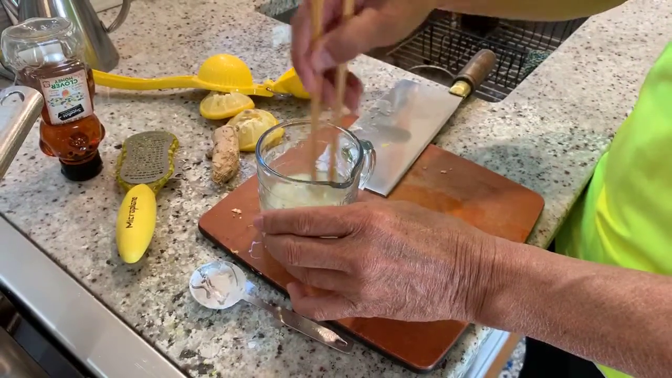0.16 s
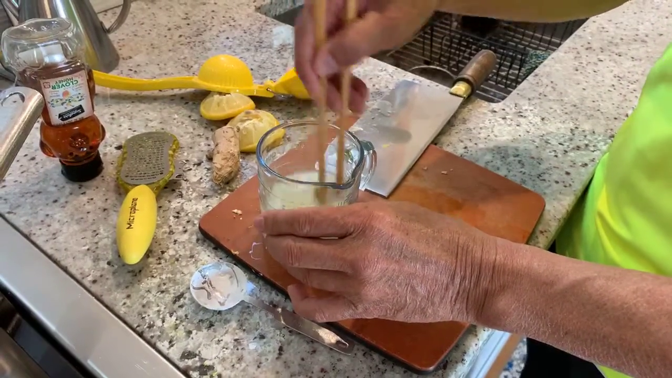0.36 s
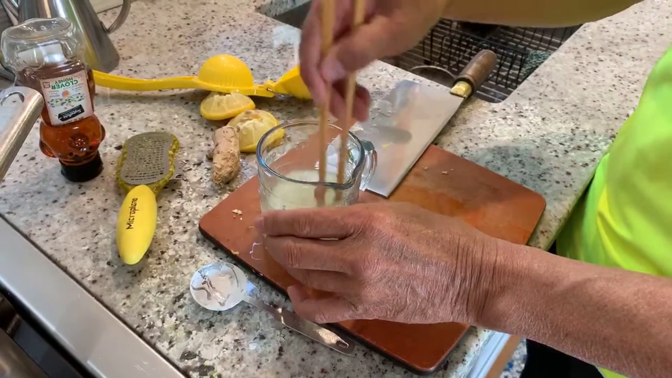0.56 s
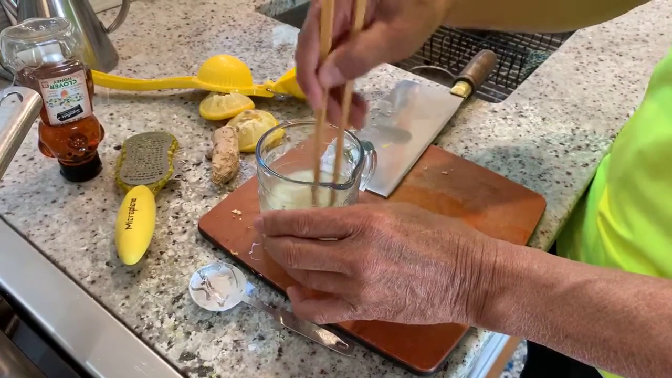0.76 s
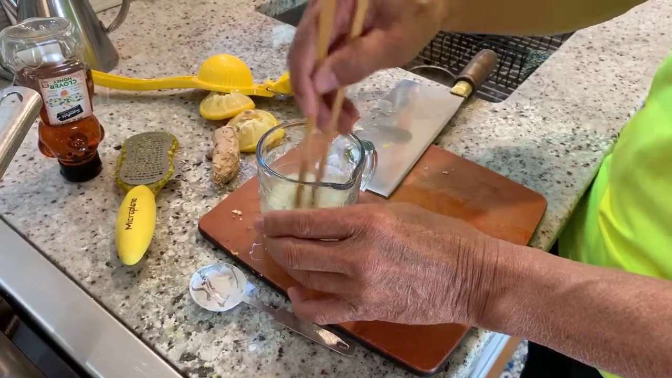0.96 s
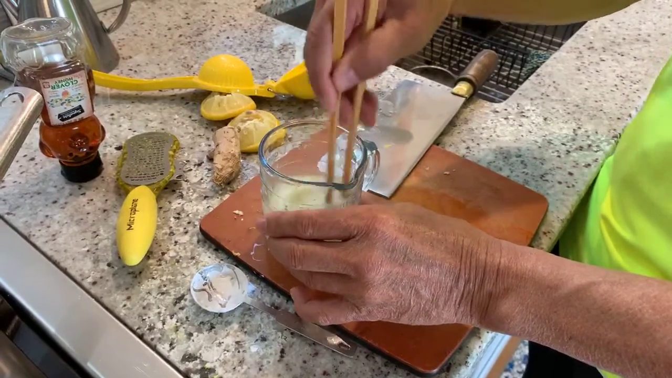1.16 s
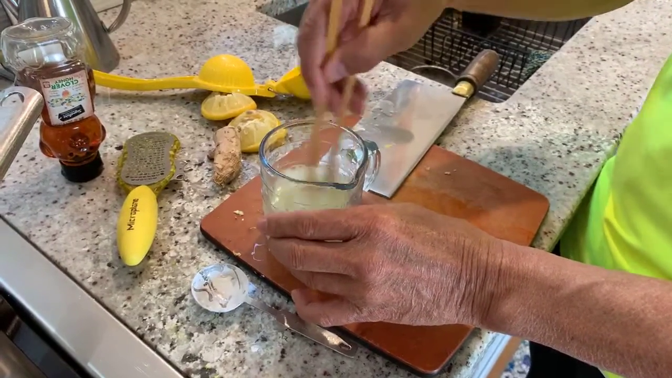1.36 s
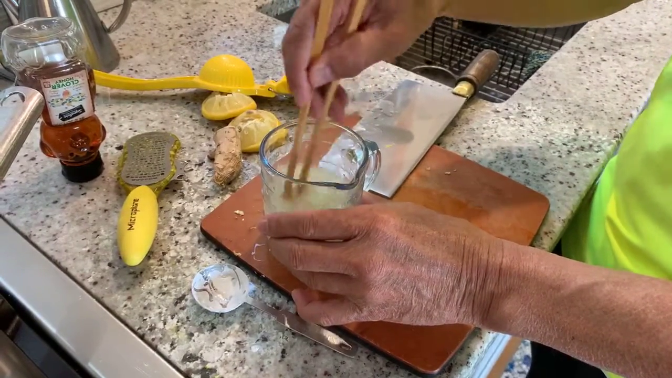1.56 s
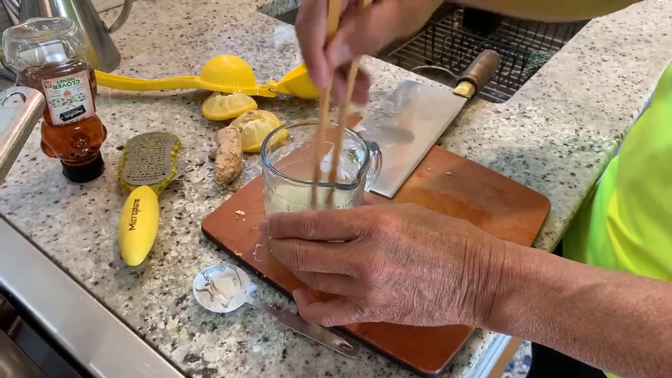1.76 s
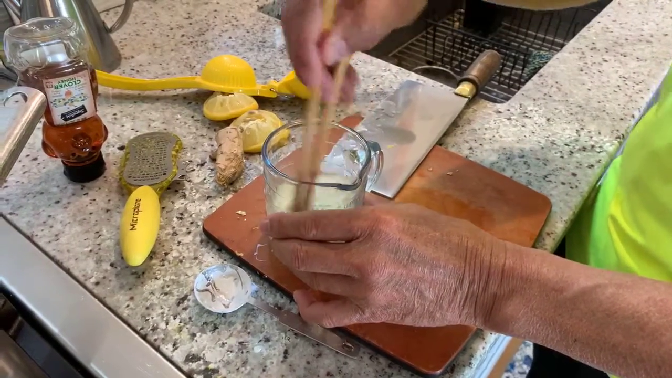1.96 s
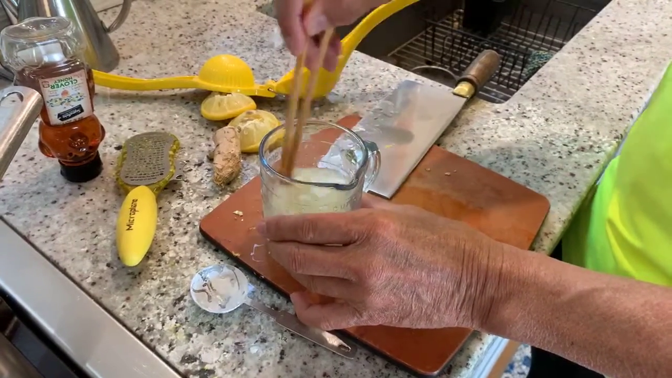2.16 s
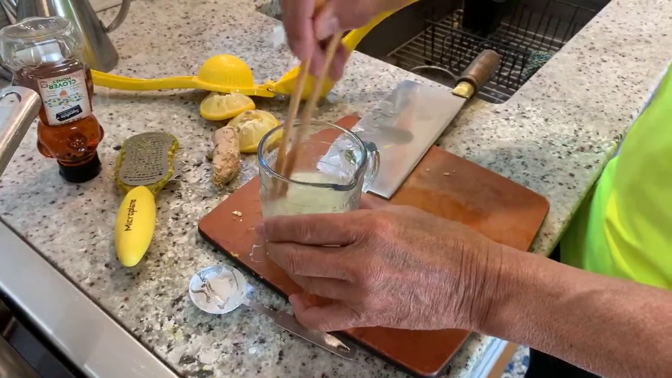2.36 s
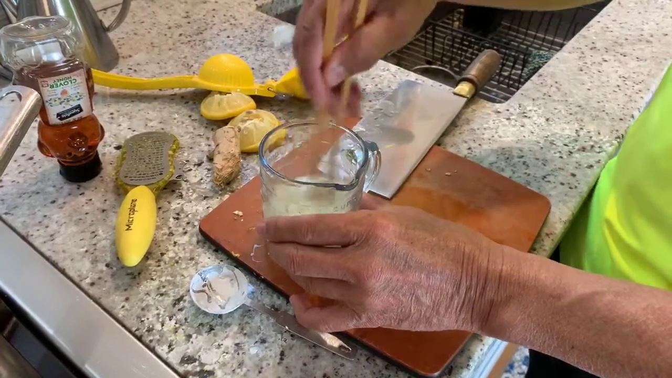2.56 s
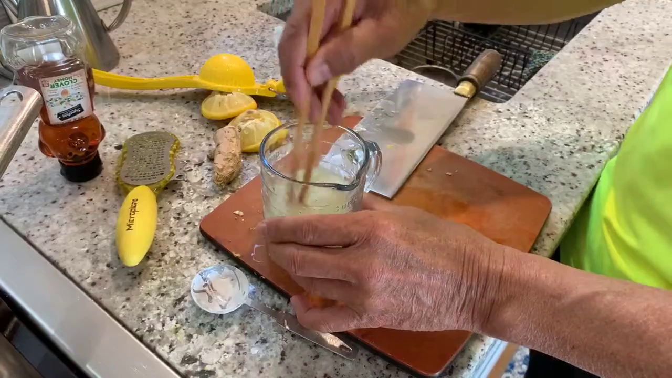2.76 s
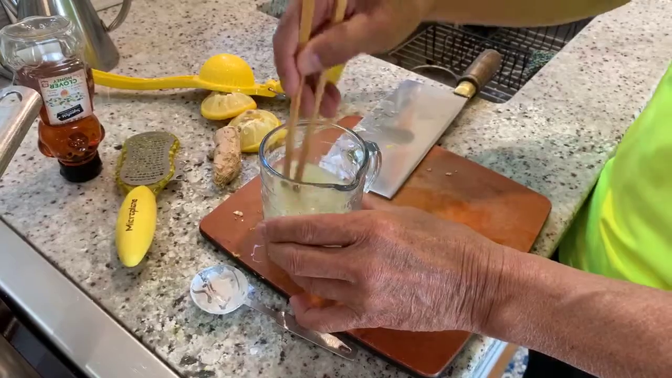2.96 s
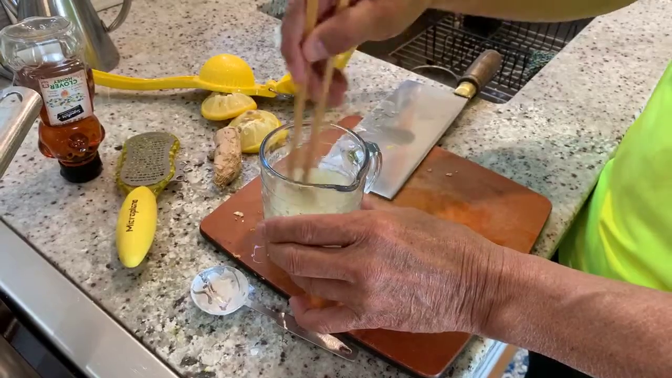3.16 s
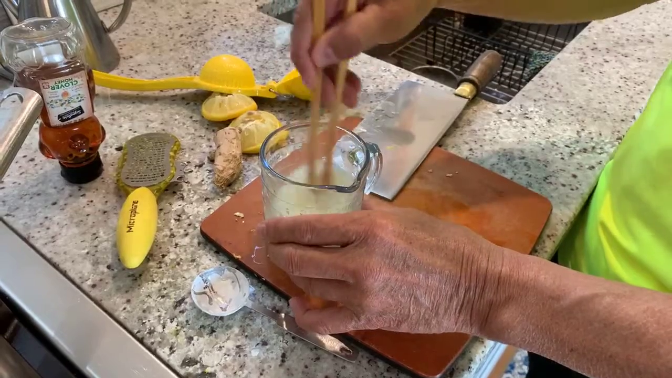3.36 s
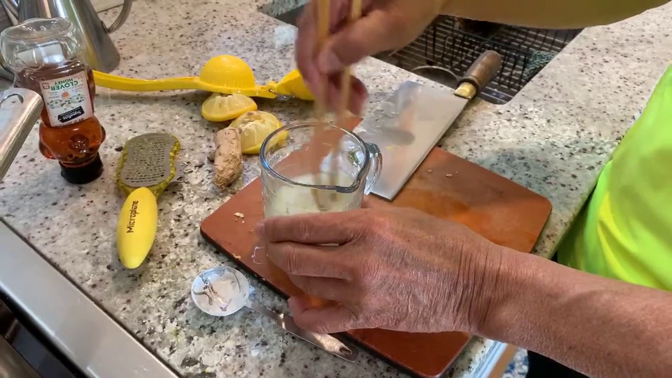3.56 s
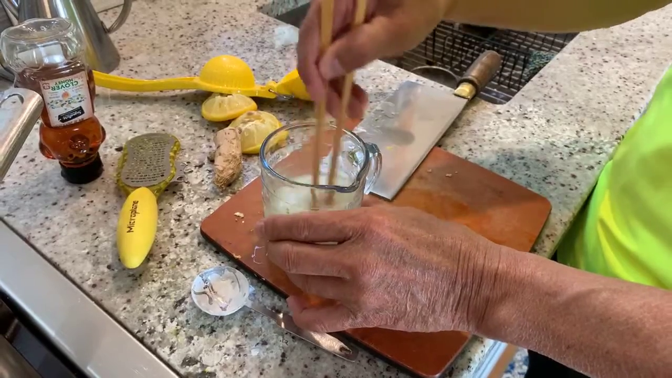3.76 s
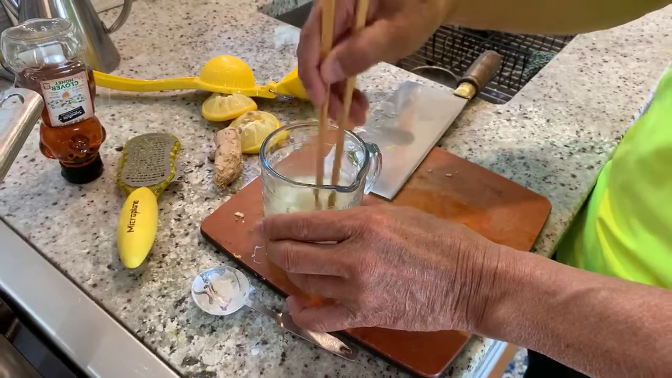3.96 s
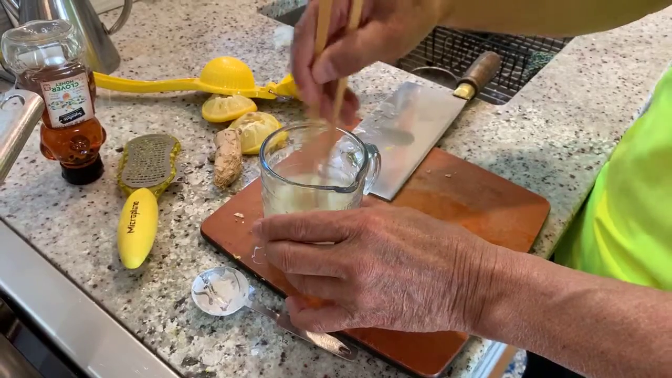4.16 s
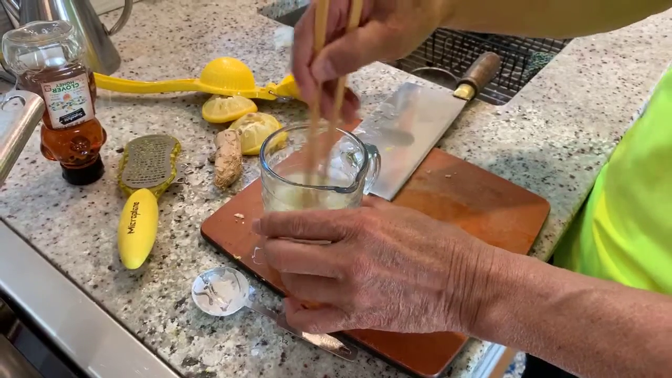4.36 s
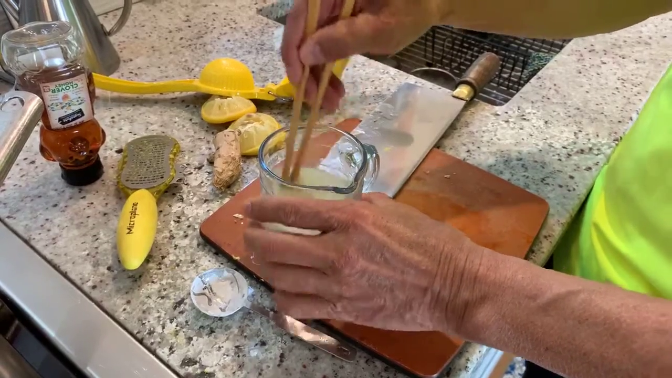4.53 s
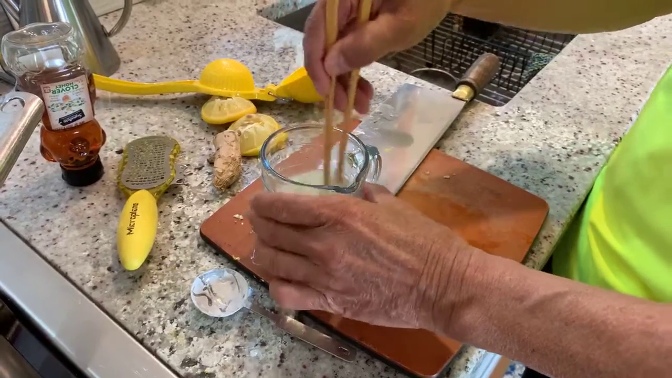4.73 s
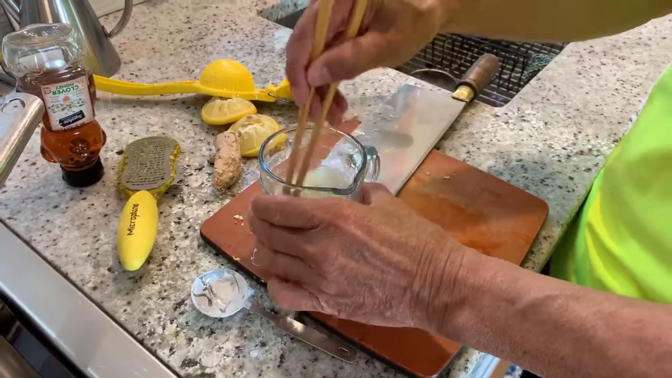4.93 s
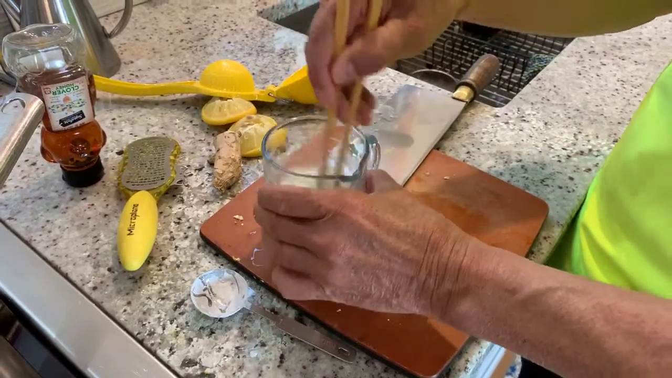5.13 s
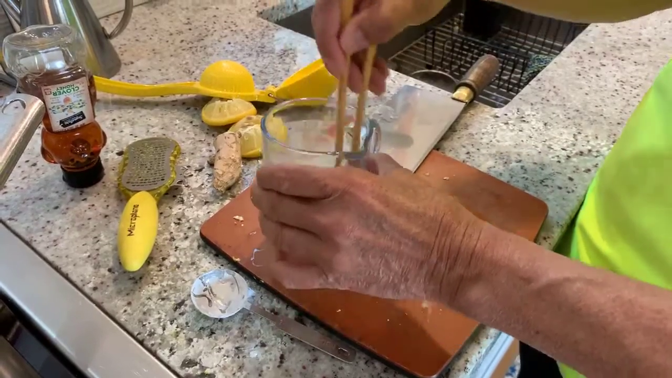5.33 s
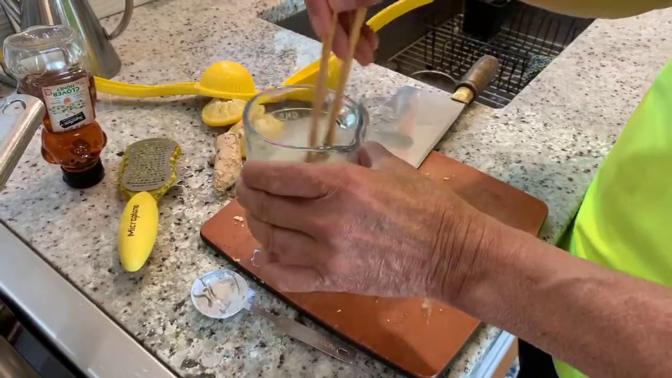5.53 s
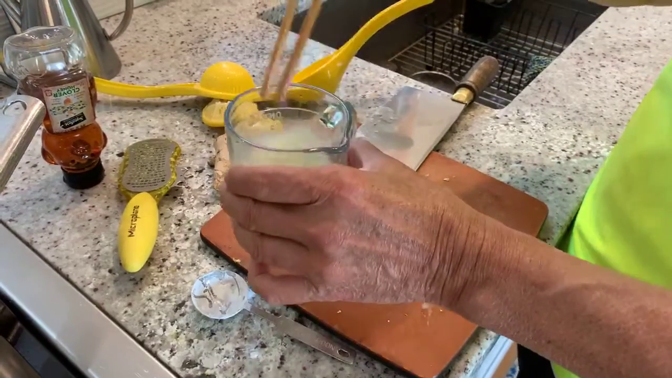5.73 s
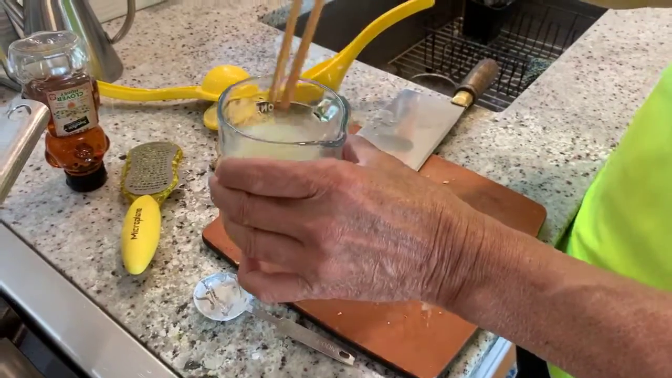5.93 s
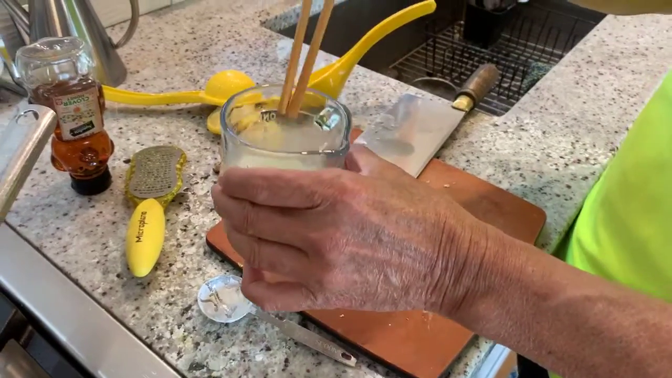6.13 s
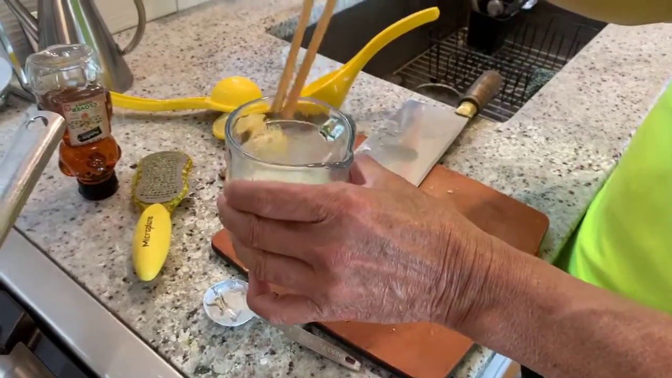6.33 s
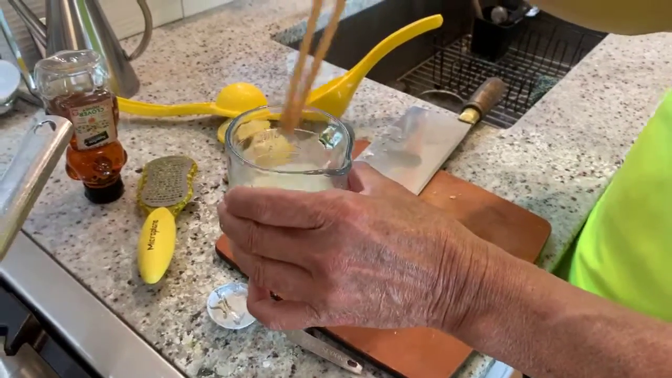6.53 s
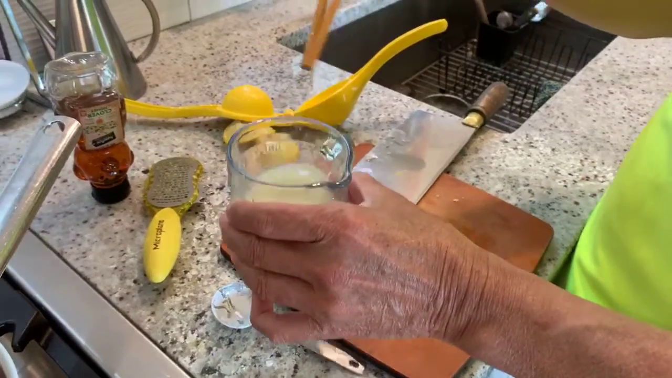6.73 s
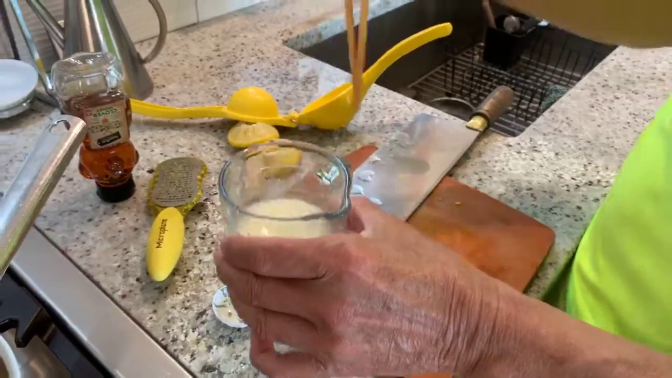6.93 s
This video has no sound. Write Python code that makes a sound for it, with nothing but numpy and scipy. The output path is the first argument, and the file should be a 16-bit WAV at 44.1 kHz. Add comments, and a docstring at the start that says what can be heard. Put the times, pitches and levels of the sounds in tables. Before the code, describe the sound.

A close single microphone in a hard, reflective kitchen, with a faint low steady hum. From 0 s wooden chopsticks stir a thick drink in a hand-held glass cup: short hollow knocks of the submerged tips, muted by the liquid, mix with small damped clinks of the shafts and a soft, grainy dragging rumble. A firmer knock and clink at about 1.1 s thuds dully in the board. The drag pauses near 2 s, leaving light ticks, then stirring resumes around 2.5 s, more gently, with a faint thud at 3.2 s. Three soft low gulps of liquid come at 4.0, 4.2 and 4.5 s. A stronger knock and thud land at 4.7 s, and the drag swells briefly, then fades by 5.4 s. Six rim taps follow, at 5.5, 5.8, 6.0, 6.2, 6.3 and 6.5 s, the first modest, the rest loud, bright, woody and glassy, with short room echoes dying into hum.

```python
"""Close by a hand-held glass cup on a kitchen counter, two wooden chopsticks stir a thick drink.
For some five seconds the tips knock hollowly under the liquid and the shafts clink on the damped wall;
the drag pauses near 2 s, heavy strokes thud in the board, and three soft gulps come between 4 and 4.5 s.
Six taps on the rim come last. Each blow rings decaying sine modes, most through a burst of small rebounds;
filtered noise makes the drag's rumble, the thuds, the hard room's echoes and the faint hum below it all."""
import sys
import numpy as np
from scipy import signal
from scipy.fft import rfft, irfft
from scipy.io import wavfile

SR = 44100
rng = np.random.default_rng(int(sys.argv[2]) if len(sys.argv) > 2 else 0)


def ratio(d):
    """dB to gain"""
    e = np.asarray(d, float) / 20
    return 10 ** e


def inscribe(sig):
    """Save sig as 16-bit PCM at rate SR to the path in sys.argv[1].

    A 1-D sig is mono; a 2-D sig holds one channel per row.
    Samples are clipped to [-1, 1] before scaling.
    """
    pcm = np.round(np.clip(np.atleast_2d(sig).T, -1, 1) * 32767)
    wavfile.write(sys.argv[1], SR, pcm.astype(np.int16))


N = 308479

# high modes of the glass wall when free: pitch_hz, level_db (relative), t60_s
HIGH_RING = [(5082, 12, 0.07), (5150, 18, 0.004)]
# sharp treble modes of a blow: pitch_hz, level_db (relative), t60_s
CRACK = [(7134, -9.5, 0.016), (7660, 9, 0.0018), (9210, 4.5, 0.0027), (10130, -5, 0.025),
         (10940, 0.5, 0.0028), (14300, -3, 0.0021)]
# sticks dragging through the drink along the glass: time_s, level_db (ahead of the mix of its parts)
DRAG = [(0, -56.5), (0.748, -74), (1.1, -59), (1.7, -65.5), (1.95, -115), (2.4, -65), (3.4, -66),
        (3.7, -73), (4.75, -57.5), (5.3, -68), (5.481, -100)]
WET_DAMPING = .22   # share of the high ring's t60 left while the drink is stirred up the wall


def rms_one(x):
    """Scale to an rms of 1."""
    return x / np.sqrt(np.mean(x ** 2) + 1e-20)


def at_hz(points, hz):
    """Read a table on a log-frequency axis."""
    table_hz, values = np.transpose(points)
    return np.interp(np.log(hz), np.log(table_hz), values)


def band(x, low_hz, high_hz, order=2):
    """Butterworth band-pass."""
    return signal.sosfilt(signal.butter(order, [low_hz, high_hz], "band", fs=SR, output="sos"), x)


def add(out, s, sound):
    """Lay one sound into the track at its time in seconds."""
    i = round(s * SR)
    out[i:i + len(sound)] += sound[:N - i]


def ring(clicks, hz, t60):
    """A two-pole resonator: a unit click sets a decaying sine of height 1 ringing."""
    radius = ratio(-60 / (max(t60, .0015) * SR))   # no decay is shorter than 1.5 ms
    w = 2 * np.pi * hz / SR
    return signal.lfilter([0, np.sin(w)], [1, -2 * radius * np.cos(w), radius * radius], clicks + 1e-18)


def chatter(events, spread_s, sustain, count, size):
    """A blow is not one touch: rows of signed rebounds that weaken within milliseconds.

    A larger sustain slows the fading."""
    draw = rng.random((events, count, 2))
    lag = draw[:, :, 0] * (np.arange(count) > 0)   # the first touch comes at once
    sign = np.sign(draw[:, :, 1] - .5)
    strength = (1 + sustain * lag) * np.exp(-2.5 * lag) * sign
    rows = np.zeros((events, size))
    np.add.at(rows, (np.arange(events)[:, None], (lag * spread_s * SR).astype(int)), strength)
    return rows / np.linalg.norm(rows, axis=1, keepdims=True)


def struck(touches, notes, low_hz, high_hz, give_s=0.0013):
    """Ring (Hz, dB, t60) notes from one blow's touches, keep the band the cup radiates; energy 1 over 10 ms.

    give_s is how slowly the wood takes up the blow."""
    t = np.arange(len(touches)) / SR
    sound = sum(ratio(db) * ring(touches, hz, t60) for hz, db, t60 in notes)
    # wood gives way softly, then rests on the glass and muffles the ring
    give = 1 - np.exp(-t / give_s)
    muffle = .5 + .5 / (1 + np.minimum(t / .014, 10) ** 8)
    sound = band(sound * give * muffle, low_hz, high_hz, order=3)
    return sound / np.sqrt(np.sum(sound ** 2) / (SR // 100))


def hum():
    """Steady appliance and microphone noise: white noise shaped across its spectrum."""
    # hum spectrum: pitch_hz, density (relative, dB per Hz)
    spectrum = [(40, -24), (70, 3), (130, -4), (320, -2), (1200, -11), (2200, -15), (3000, -24.5),
                (12000, -36.5), (16000, -50)]
    hz = np.maximum(np.fft.rfftfreq(N, 1 / SR), 1)
    shaped = irfft(rfft(rng.standard_normal(N)) * ratio(at_hz(spectrum, hz)), N)
    return ratio(-67) * rms_one(shaped)


def kitchen(x, early_db, late_db):
    """Close echoes off counter and wall, then a noise tail that dies band by band."""
    # decay of the hard-walled room: pitch_hz, t60_s
    room_t60 = [(1200, 0.51), (3500, 0.44), (9000, 0.34), (16000, 0.13)]
    t = np.arange(SR) / SR
    white = rng.standard_normal((2, SR))
    edges = 100 * 2 ** np.arange(0, 7.6, .5)   # half-octave bands, Hz
    tail = np.zeros(SR)
    for k, (low, high) in enumerate(zip(edges, edges[1:])):
        t60 = at_hz(room_t60, np.sqrt(low * high))
        tail += band(white[k % 2], low, high) * ratio(-60 * t / t60)
    tail *= 1 - np.exp(-t / 0.00088)
    early = rng.standard_normal(SR) * (rng.random(SR) < .03)   # sparse reflections
    early *= np.exp(-t / 0.0061) * (t > .002)
    echo = ratio(early_db) * early / np.linalg.norm(early) + ratio(late_db) * tail / np.linalg.norm(tail)
    return signal.fftconvolve(x, echo)[:N]


def thumps():
    """The board answers a rock of the cup with a broad dull thud, its lows and body dying together.

    Gulps are short soft notes."""
    # cup base rocking on the board: start_s, level_db (ahead of its fades)
    thuds = [(1.084, -49.5), (3.2, -57), (4.74, -48)]
    # low gulps of the liquid: start_s, level_db (ahead of its fades)
    gulps = [(3.992, -51), (4.22, -52.5), (4.454, -51)]
    out, t = np.zeros(N), np.arange(SR // 2) / SR
    for (s, level_db), noise in zip(thuds, rng.standard_normal((len(thuds), len(t)))):
        lows = rms_one(band(noise, 61, 190, order=3)) * np.exp(-t / 0.05)
        body = rms_one(band(noise, 230, 1370)) * np.exp(-t / 0.046)
        add(out, s, ratio(level_db) * (lows + body) * (1 - np.exp(-t / 0.0038)))
    for s, level_db in gulps:
        fades = np.exp(-t / 0.026) * (1 - np.exp(-t / 0.0063))
        add(out, s, ratio(level_db) * np.sin(2 * np.pi * 210 * t) * fades)
    return out


def drag():
    """Small random touches of the moving tips ring short hollow notes and tick; the stroke rumbles in the board."""
    grains_per_s, grain_spread_db, grain_cycles = 260, 6.0, 28   # cycles a note takes to fall 60 dB
    happens = rng.random(N) < grains_per_s / SR
    strength = ratio(grain_spread_db * np.minimum(rng.exponential(1, N), 3))
    grains = happens * strength * rng.choice([-1, 1], N)
    pitches_hz = np.geomspace(1000, 2400, 10)
    dealt = rng.integers(0, 10, N)   # which pitch each grain rings
    notes = np.zeros(N)
    for k, hz in enumerate(pitches_hz):
        notes += ring(grains * (dealt == k), hz, grain_cycles / hz) * (1200 / hz) ** 0.15
    ticks = band(np.cbrt(grains), 2400, 5200)   # the cube root evens the grains out
    t = np.arange(N) / SR
    surges = np.interp(t, np.arange(0, 7.1, .125), rng.standard_normal(57))
    rumble = band(rng.standard_normal(N), 51, 311) * ratio(7.2 * surges)
    times_s, level_db = np.transpose(DRAG)
    moving = ratio(np.interp(t, times_s, level_db, right=-120))
    hollow_part = ratio(-4.5) * rms_one(band(notes, 1050, 2600))
    return moving * (hollow_part + ratio(-17.5) * rms_one(ticks) + ratio(-8.5) * rms_one(rumble))


def clinks():
    """The low ring takes the first push; the high ring, clack and crack share the rebounds.

    The landing spot varies the glass and crack modes' strengths, and harder blows are brighter."""
    # shafts on wall and rim, levels over 10 ms:
    # start_s, low_ring_db, high_ring_db, wood_clack_db, clack_hz, crack_db
    blows = [(0.0474, -56, -57, -54.5, 3200, -62.5), (0.2299, -63, -55.5, -58.5, 3390, -63.5),
             (0.4803, -53, -51, -43, 3700, -61), (1.036, -41, -41.5, -51, 4660, -59),
             (1.1538, -59, -55.5, -50.5, 2280, -62.5), (1.285, -53, -61, -50.5, 2320, -71.5),
             (1.4474, -54, -55, -56.5, 2720, -64.5), (1.635, -49, -47, -65, 4400, -56),
             (1.8264, -52, -48, -55, 3340, -48), (2.1015, -61.5, -47, -57, 4300, -58),
             (2.113, -50.5, -51.5, -54, 3400, -49), (2.328, -50, -49, -54.5, 4150, -58),
             (2.799, -59, -63.5, -60.5, 2570, -76), (2.996, -55, -63, -58.5, 3230, -67.5),
             (3.1524, -53.5, -57.5, -59, 3380, -70), (3.4614, -53, -61, -48.5, 3700, -68),
             (3.984, -46, -49.5, -80, 2495, -65), (4.146, -62, -70, -54, 2200, -62.5),
             (4.197, -47.5, -55.5, -74, 2530, -71), (4.4488, -53, -53, -63, 4400, -75),
             (4.462, -46, -56.5, -54, 3440, -64), (4.6554, -50, -54, -76, 2400, -71),
             (4.8054, -53, -49, -45, 2430, -53), (4.954, -43.5, -41.5, -56, 3500, -49.5),
             (5.5059, -41.5, -42, -53.5, 3930, -62.5), (5.8004, -34.5, -36.5, -40.5, 4320, -42),
             (5.9687, -32.5, -37.5, -35, 4330, -32), (6.1558, -30, -35, -32.5, 4300, -27.5),
             (6.3424, -29, -26.5, -32.5, 4530, -30), (6.5191, -32, -37, -34, 4630, -32.5)]
    # low modes of the glass wall: pitch_hz, level_db (relative), t60_s
    low_ring = [(1920, -5, 0.018), (2012, 2.5, 0.07), (2172, 5, 0.08)]
    # the wood's notes while stirring: multiple of clack_hz, level_db (relative), t60_s
    clack_notes = [(1, 0, .009), (.76, -11, .003), (1.16, -3, .007)]
    still_db = -74      # dragging below this leaves the drink settled and the wall above it free
    dry_smack_db = -12  # on the free wall the broad last mode of the high ring nearly goes
    dry_clack = .45     # share of the clack's t60 left in raps on the free wall
    out = np.zeros(N)
    touches = chatter(len(blows), .014, sustain=0.51, count=16, size=8192)
    spots_db = 2.5 * rng.standard_normal((len(blows), 8))
    for (s, low_db, high_db, clack_db, clack_hz, crack_db), touch, spot in zip(blows, touches, spots_db):
        free = np.interp(s, *np.transpose(DRAG)) < still_db
        first = touch * (np.arange(len(touch)) < .001 * SR)   # only the first millisecond
        low = [(hz, db + d, t60) for (hz, db, t60), d in zip(low_ring, spot)]
        high = []
        for (hz, db, t60), d in zip(HIGH_RING, spot):
            smack_db = dry_smack_db * (free and hz == HIGH_RING[-1][0])
            length = 1 if free else WET_DAMPING
            high.append((hz * (1 + 0.0013 * spot[-1]), db - d + smack_db, t60 * length))
        clack = [(k * clack_hz, db, t60 * (dry_clack if free else 1)) for k, db, t60 in clack_notes]
        tilt_db = min(1.53 * (crack_db + 36.5), 1.5)   # per octave
        crack = [(hz, db + d + tilt_db * np.log2(hz / 8000), t60)
                 for (hz, db, t60), d in zip(CRACK, spot[1:])]
        add(out, s, ratio(low_db) * struck(first, low, 1035, 2230))
        add(out, s, ratio(clack_db) * struck(touch, clack, 1140, 4780))
        add(out, s, ratio(high_db) * struck(touch, high, 3720, 6150))
        add(out, s, ratio(crack_db) * struck(touch, crack, 5300, 14900))
    return out


def knocks():
    """The note moves with grip and depth; liquid softens the contact, and only a faint tick gets above the notes."""
    # tips on the submerged base, levels over the first 10 ms: start_s, pitch_hz, note_db, overtones_db
    blows = [(0.0441, 1100, -41.5, -65), (0.2313, 1194, -47, -47), (0.2597, 1188, -47, -52.5),
             (0.42, 1400, -61, -81), (0.474, 1153, -44, -48), (0.617, 1380, -42.5, -55),
             (0.6581, 1256, -50, -57), (0.825, 1156, -55, -54), (0.879, 1237, -47, -57),
             (0.982, 1360, -46.5, -58.5), (1.02, 1220, -46, -53), (1.034, 1207, -44, -36.5),
             (1.079, 1167, -32.5, -40.5), (1.1543, 1156, -41, -70), (1.282, 1158, -39.5, -54),
             (1.447, 1185, -47.5, -54), (1.5183, 1250, -46.5, -57), (1.627, 1186, -34.5, -46),
             (2.463, 1225, -44.5, -47.5), (2.526, 1215, -35, -58), (2.633, 1206, -48.5, -63),
             (2.6659, 1004, -43.5, -43), (2.703, 1190, -41.5, -55), (2.914, 1210, -50, -52),
             (3, 1194, -38, -61), (3.1528, 1185, -43.5, -64), (3.1929, 1206, -35.5, -38),
             (3.394, 1246, -49, -57.5), (3.4283, 1270, -50, -58.5), (3.7929, 1253, -47.5, -61.5),
             (3.891, 1250, -55, -66), (3.986, 1199, -50, -48), (4.199, 1310, -49, -54.5),
             (4.265, 1310, -45, -55.5), (4.4249, 1276, -54, -70), (4.526, 1230, -42, -50.5),
             (4.653, 1177, -55, -46.5), (4.688, 1240, -36.5, -48.5), (4.73, 1185, -32, -38),
             (5.013, 1140, -46.5, -70), (5.1759, 1160, -49.5, -61.5), (5.232, 1182, -41.5, -53),
             (5.67, 1060, -61.5, -80)]
    # the hollow note's modes: multiple of pitch_hz, level_db (relative), t60_s
    hollow = [(1, 1.5, .028), (.93, -14, .02), (1.12, -7, .02)]
    # its overtones, ahead of a random detune: multiple of pitch_hz, level_db (relative), t60_s
    overtone_modes = [(1.36, 0, .02), (1.6, -2, .02), (1.82, -3, .018)]
    soaked_give_s = 0.0097   # under the liquid the wood takes up a blow more slowly
    glide_per_s = 1.6        # spread of the note's slide as the liquid sloshes, share of its pitch a second
    tick_db = -17            # the tip's tick in the treble, relative to the overtones
    out = np.zeros(N)
    touches = chatter(len(blows), .013, sustain=0.97, count=8, size=4096)
    detune = rng.standard_normal((len(blows), 4))
    wet_ring = [(hz, db, t60 * WET_DAMPING) for hz, db, t60 in HIGH_RING]
    for (s, hz, note_db, over_db), touch, (slosh, *shift) in zip(blows, touches, detune):
        modes = [(k * hz, db, t60) for k, db, t60 in hollow]
        note = struck(touch, modes, 1051, 2150, soaked_give_s)
        n = np.arange(len(touch))
        warped = n * (1 + glide_per_s * slosh * n / SR / 2)   # reading faster or slower slides the pitch
        add(out, s, ratio(note_db) * np.interp(warped, n, note))
        overtones = [(k * hz * (1 + 0.085 * d), db, t60) for (k, db, t60), d in zip(overtone_modes, shift)]
        add(out, s, ratio(over_db) * struck(touch, overtones, 1730, 4270, soaked_give_s))
        add(out, s, ratio(over_db + tick_db) * struck(touch, wet_ring + CRACK, 3800, 9000))
    return out


def scene():
    """The cup, its room and the hum; as hand and cup move, the echoes blend between four patterns."""
    tips, shafts = knocks(), clinks() + drag()
    sent = ratio(-3) * tips + shafts   # knocks deep in the held cup reach the room less
    turn, sway = 2 * np.pi * np.outer([1.3, 2.1], np.arange(N) / SR)   # at 1.3 and 2.1 Hz
    shares = [a * b for a in (np.cos(turn), np.sin(turn)) for b in (np.cos(sway), np.sin(sway))]
    room = sum(kitchen(sent * share, early_db=-2.0, late_db=-4.5) for share in shares)
    return (tips + shafts + room + thumps() + hum())[None]


def roll_off(x):
    """The treble ends steeply here."""
    return signal.sosfilt(signal.butter(12, 16660, fs=SR, output="sos"), x)


def record(dry):
    """One microphone, its top cut steeply by a low-pass 40 dB down at 16.3 kHz."""
    top_cut = signal.cheby2(10, 40, 16300, fs=SR, output="sos")
    mix = signal.sosfilt(top_cut, dry)
    return roll_off(mix)


dry = scene()
out = record(dry)
inscribe(out)
```